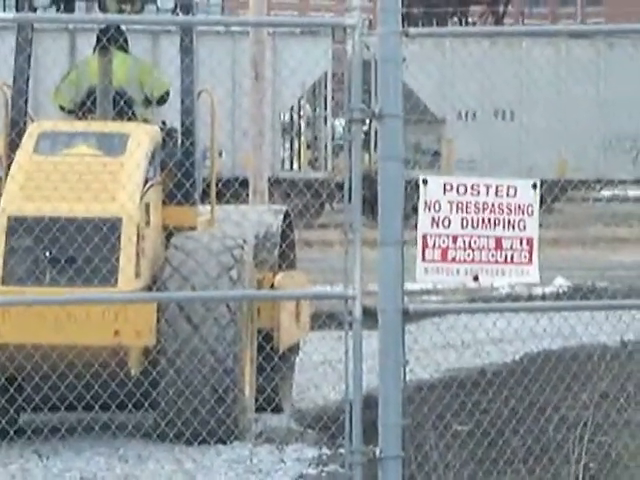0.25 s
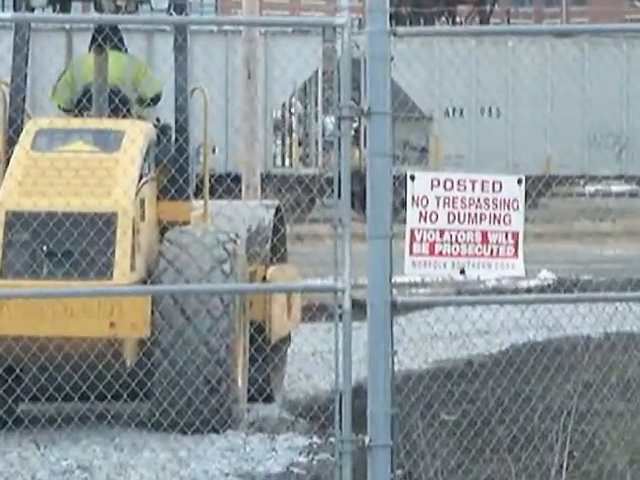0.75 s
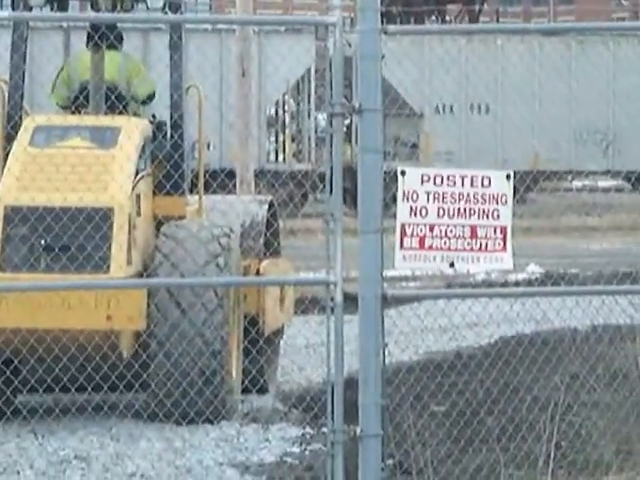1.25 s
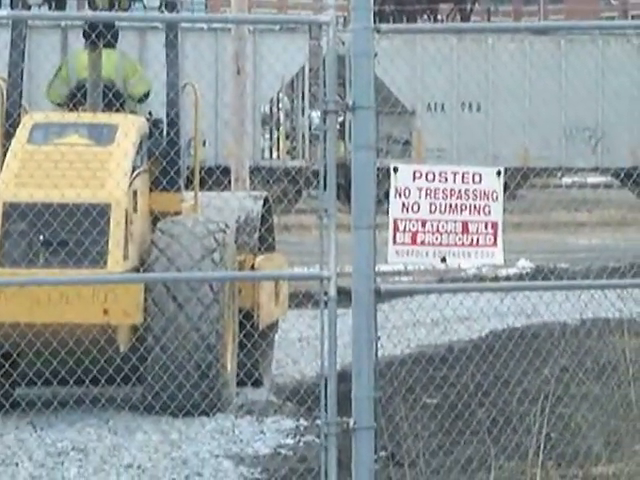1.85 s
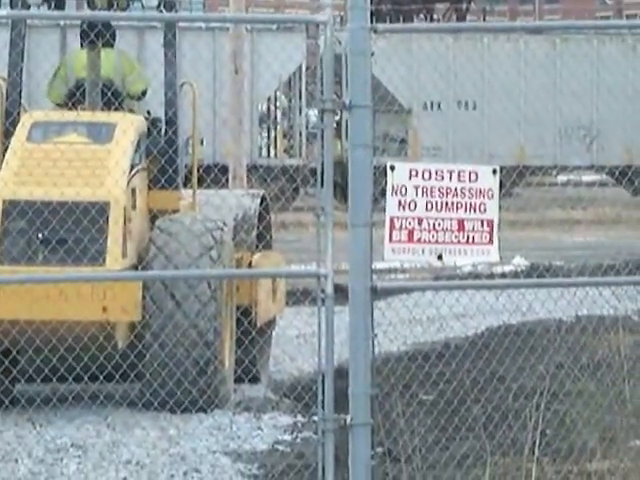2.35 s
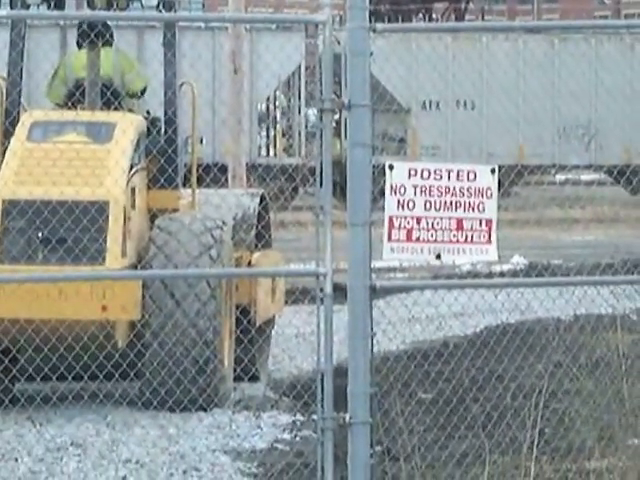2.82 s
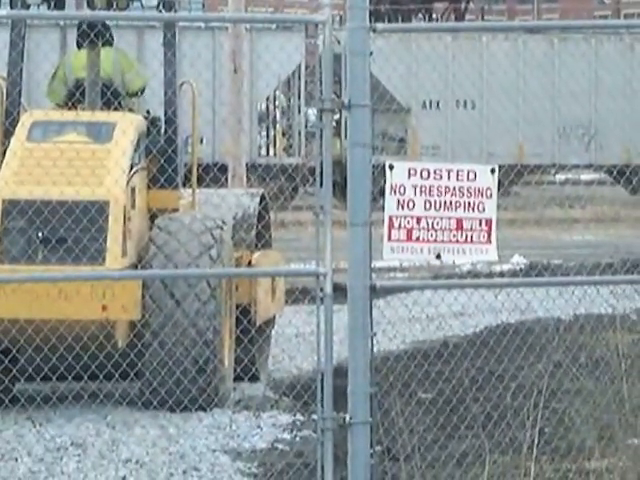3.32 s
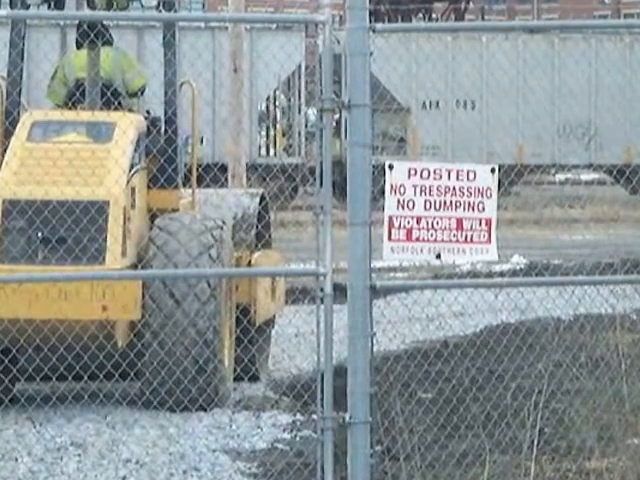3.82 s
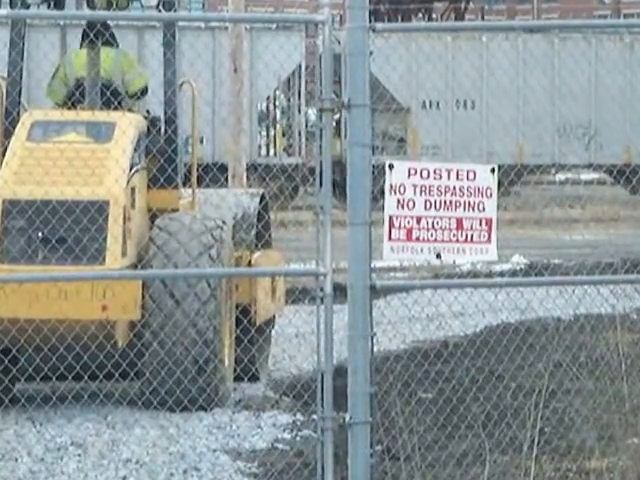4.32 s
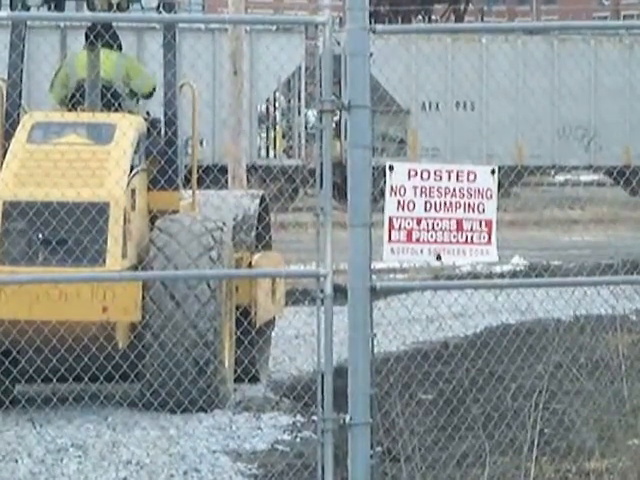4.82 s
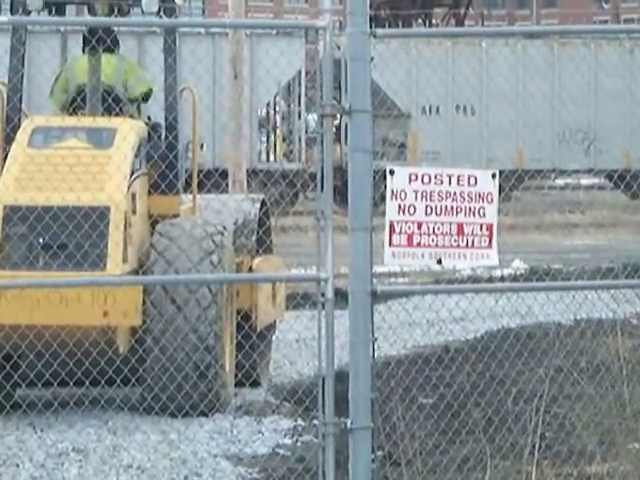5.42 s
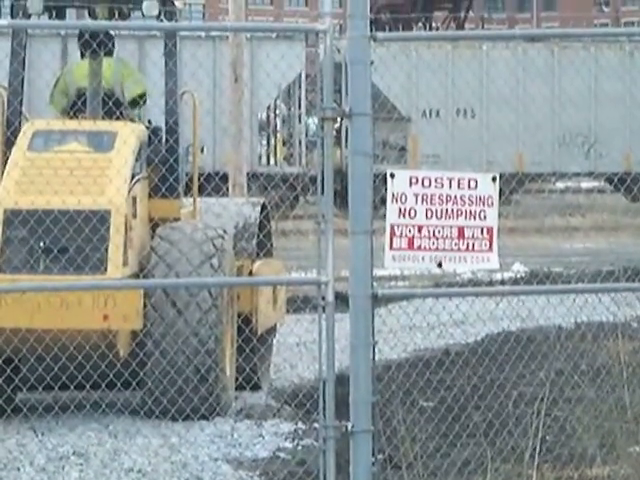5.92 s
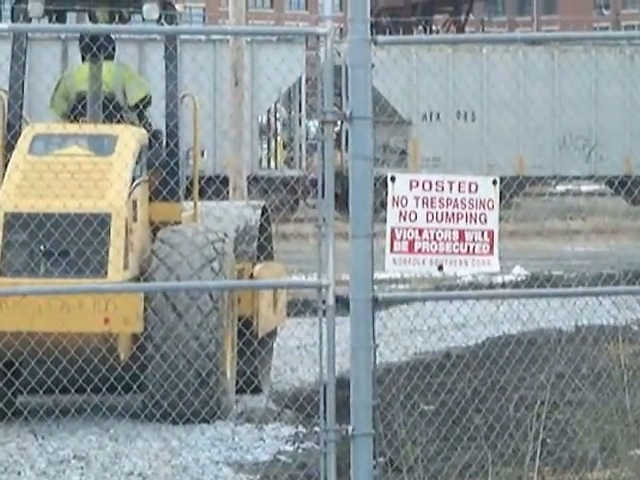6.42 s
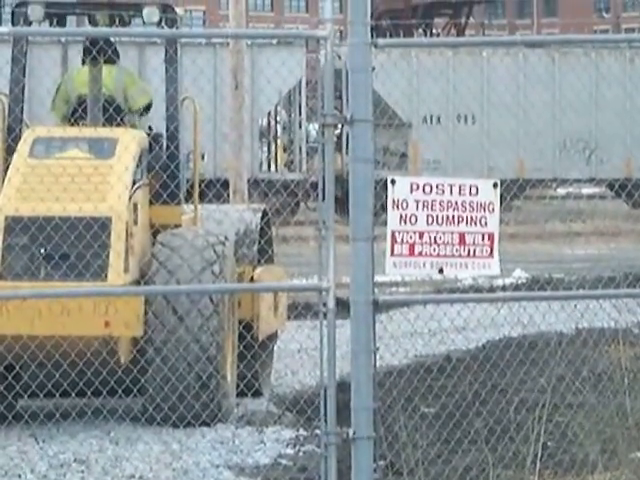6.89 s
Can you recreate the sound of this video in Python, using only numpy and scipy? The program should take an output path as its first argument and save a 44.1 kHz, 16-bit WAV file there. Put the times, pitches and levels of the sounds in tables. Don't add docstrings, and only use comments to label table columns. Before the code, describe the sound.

Outdoors at a work site, a road roller's diesel engine idles steadily from start to finish, clattering and ticking with a thin mechanical whine and airy rush. Wind dominates in the foreground, striking the microphone in irregular low thuds, rough flutter and short cracks, briefly easing between gusts. The wind overloads softly, the engine sinks beneath it, and the top end is muffled, as on a small handheld device.

```python
import sys
import numpy as np
from scipy import signal
from scipy.fft import rfft, irfft
from scipy.io import wavfile

SR = 44100
rng = np.random.default_rng(int(sys.argv[2]) if len(sys.argv) > 2 else 0)


def boost(x):
    u = np.asarray(x, float) / 20
    return 10 ** u


def int16_out(signal):
    q = np.round(np.clip(np.atleast_2d(signal).T, -1, 1) * 32767)
    wavfile.write(sys.argv[1], SR, q.astype(np.int16))


N = 315315

# t/s, level/dB
AIRFLOW = [(0.0, -21), (0.57, -17), (0.69, -33.5), (0.74, -21), (1.47, -17.5), (1.53, -32), (1.81, -17),
           (2.59, -22), (2.69, -17.5), (3.27, -18.5), (3.34, -22), (3.74, -17), (3.88, -24), (4.2, -20),
           (4.28, -21.5), (5.44, -16.5), (5.51, -19.5), (7.15, -21)]
AIRFLOW_SHARES = (0.79, 0.62, 0.76)
# start t/s, length/s, level over calm/dB
GUSTS = [(0.0, 0.054, 9.5), (0.15, 0.19, 6), (0.423, 0.13, 7), (0.734, 0.14, 19), (1.133, 0.16, 15),
         (1.274, 0.15, 21.5), (1.572, 0.04, 11), (1.829, 0.093, 13), (1.97, 0.089, 19.5), (2.226, 0.2, 10),
         (2.534, 0.16, 13), (2.72, 0.16, 17.5), (2.944, 0.21, 16.5), (3.08, 0.17, 24.5), (3.358, .2, 8),
         (3.68, 0.052, 2.5), (4.001, 0.042, 12.5), (4.106, .18, 23), (4.32, 0.074, 8.5), (4.457, .09, 15),
         (4.667, 0.3, 14), (5.068, 0.065, 21.5), (5.159, 0.27, 21), (5.482, 0.098, 11.5),
         (5.638, 0.089, 17.5), (5.87, 0.14, 16), (5.991, 0.27, 22), (6.25, 0.41, 15.5), (6.667, .2, 22),
         (6.887, .3, 21.5)]
# t/s, drop given back/dB, drop kept/dB
GAIN_DUCKS = [(-0.2, 2.5, -0.5), (0.55, 1.5, -0.5), (1.35, 3.5, -0.5), (1.8, 2, -0.5), (2.3, 0, 1.5),
              (2.95, 1, 1), (3.17, 0, 3.5), (3.26, 2.5, 1), (4.17, 2.5, -2), (4.85, 2, 0), (5.34, 3.5, 3),
              (6.35, 1.5, -0.5), (6.85, 4, -3.5)]
# f/Hz, level/dB
ENGINE_PARTS = [(770, 0), (1150, 1), (1280, 4.5), (1560, -4), (1870, -2), (2520, 0), (3330, -18),
                (4170, -11.5), (5780, -19)]
# place/cycle, lowest part/index, highest part/index, level/dB
CYCLE_STRIKES = [(.025, 0, 0, 0), (.03, 5, 5, -4), (.15, 4, 4, 0), (.15, 6, 6, -2), (.19, 0, 0, 0),
                 (.215, 2, 3, -3), (.215, 5, 8, 0), (.28, 1, 1, 0), (.28, 5, 5, 0), (.31, 3, 3, 1),
                 (.31, 0, 1, -2), (.38, 5, 6, 1), (.41, 8, 8, 0), (.445, 0, 1, 1), (.49, 6, 7, 1),
                 (.53, 5, 5, -2), (.54, 7, 7, 3), (.565, 0, 1, -1), (.56, 4, 4, 0), (.63, 5, 5, 0),
                 (.7, 2, 3, 2), (.705, 5, 8, -1), (.77, 0, 0, 0), (.78, 7, 7, -4), (.835, 4, 4, 0),
                 (.84, 1, 1, -2), (.89, 4, 5, 0), (.965, 2, 3, 2), (.98, 6, 8, 0)]
# f/Hz, rms level/dB
GEAR_TONES = [(812.9, -48), (877.5, -53), (942.1, -52), (1098, -48), (1202, -50), (1244, -50),
              (1319, -45.5), (1416, -47.5), (1534, -48), (1776, -68.5), (1857, -49.5), (2003, -48.5),
              (2186, -73.5), (2266, -62.5), (2369, -55.5), (2444, -46), (2552, -46.5), (2622, -45),
              (3074, -54.5), (4118, -58)]
# f/Hz, level per Hz/dB
RUSH_SPECTRUM = [(260, -26.5), (450, -18.5), (509, 3), (933, -4.5), (1080, -4), (1170, -9), (1420, -0.5),
                 (2210, -3), (2540, -3.5), (2800, -3.5), (4210, -12.5), (4710, -20), (6020, -21),
                 (7810, -30), (8620, -50.5), (11200, -75.5), (19000, -120)]
# middle t/s, peak level/dB, f/Hz
EDDY_ROLLS = [(0.449, -12, 108), (0.528, -13, 99), (0.579, -14, 44.4), (0.778, -14.5, 50.6),
              (1.021, -15.5, 104), (1.26, -16, 115), (1.6, -19.5, 200), (1.811, -9.5, 110),
              (1.849, -18.5, 50), (2.001, -16, 101), (2.18, -16, 108), (2.77, -18, 49.5),
              (2.882, -12.5, 120), (3.029, -9.5, 116), (3.14, -12, 85), (3.259, -16.5, 51.5),
              (2.96, -14, 191), (3.721, -11.5, 95), (4.181, -12.5, 44.4), (4.379, -20, 108),
              (4.838, -16, 46), (5.22, -13.5, 200), (5.31, -12.5, 111), (5.429, -16, 50), (5.7, -19, 50.5),
              (6.118, -12, 100), (6.35, -18, 49.7), (6.73, -13.5, 117), (7.039, -15.5, 50),
              (7.109, -12, 113)]
# t/s, peak level/dB, centre f/Hz
AIR_SLAPS = [(0.738, -2.5, 180), (1.021, -5.5, 174), (1.371, 0.5, 200), (1.407, -13, 276), (1.897, 0, 218),
             (2.186, 2, 176), (2.939, -9, 186), (3.145, -4, 240), (3.168, -0.5, 191), (3.196, -12, 383),
             (3.228, -4.5, 199), (3.525, -4.5, 182), (3.999, -5, 195), (4.096, -9, 218), (4.188, -1, 219),
             (4.233, -17, 171), (4.362, -0.5, 176), (4.473, -29, 183), (4.5, -4, 294), (4.532, -12, 325),
             (4.957, -4, 197), (5.049, -4, 235), (5.181, -1, 226), (5.384, -9, 242), (5.624, -11, 230),
             (5.901, -3, 265), (6.116, -8, 276), (6.195, -8, 310), (7.098, -0.5, 253)]
# t/s, peak level/dB, centre f/Hz
AIR_CRACKS = [(0.738, -19, 540), (1.36, -10.5, 534), (1.407, -19.5, 584), (3.196, -18.5, 544),
              (3.268, -9.5, 380), (4.165, -11.5, 480), (4.189, -17, 536), (4.235, -17, 546),
              (4.475, -14.5, 501), (4.534, -13, 517), (5.108, -11.5, 620), (5.184, -19, 552),
              (5.386, -21, 616), (5.623, -22, 595), (6.115, -14, 595), (6.196, -20, 536),
              (7.099, -18.5, 651)]
# f/Hz, rms level/dB
CONVERTER_TONES = [(7986, -83), (8014, -83)]

CALM_RASP_DB, CALM_FLUTTER_DB, CALM_THUD_DB, CALM_BUFFET_DB = -46.5, -31.5, -22, -24.5
MEAN_FLOW_DB = -19
GUST_RISE_S, GUST_FALL_S = 0.03, 0.045
GUST_SHARE, FLUTTER_FULL_DB = 0.65, 14
CALM_FOLLOWS = 0.27
ENGINE_DB, DUCK_S, RECOVER_S = -36.5, 0.031, 0.44
CYCLE_HZ = 9.147
PART_SPREAD_CYCLES = 0.015
ROLL_CYCLES = 1.67


def rms_one(x):
    return x / np.sqrt(np.mean(x ** 2) + 1e-20)


def drift(rate_hz):
    pole = np.exp(-20 * np.pi * rate_hz / SR)
    noise = rng.standard_normal(N // 10 + 8002)
    slow = signal.lfilter([1], [1, -2 * pole, pole * pole], noise)[8000:]
    return np.interp(np.arange(N) / 10, np.arange(len(slow)), rms_one(slow))


def low_pass(x, hz, order=2):
    return signal.sosfilt(signal.butter(order, hz, fs=SR, output="sos"), x)


def band(x, low_hz, high_hz, order=2):
    return signal.sosfilt(signal.butter(order, [low_hz, high_hz], "band", fs=SR, output="sos"), x)


def noise_band(low_hz, high_hz, order=2):
    return rms_one(band(rng.standard_normal(N + SR // 2), low_hz, high_hz, order=order)[-N:])


def gain_control():
    t = np.arange(N) / SR
    level_db = np.full(N, ENGINE_DB)
    for s, back_db, kept_db in GAIN_DUCKS:
        since_s = np.maximum(t - s, 0)
        onset = 1 - np.exp(-since_s / DUCK_S)
        level_db = level_db - onset * (kept_db + 1.49 * back_db * np.exp(-since_s / RECOVER_S))
    return level_db


def gusts():
    t = np.arange(N) / SR
    calm_db = CALM_FOLLOWS * (gain_control() - ENGINE_DB)
    gust_db = calm_db
    for s, length_s, peak_db in GUSTS:
        rise = (t - s) / GUST_RISE_S + 1
        fall = (s + length_s - t) / GUST_FALL_S + 1
        shape = np.clip(np.minimum(rise, fall), 0, 1)
        gust_db = np.maximum(gust_db, calm_db + (peak_db - calm_db) * shape)
    return gust_db


def airflow():
    flow_s, level_db = np.transpose(AIRFLOW)
    flow_db = np.interp(np.arange(N) / SR, flow_s, level_db) - MEAN_FLOW_DB
    gust_db = gusts()
    buffet_db, thud_db, flutter_db = (share * flow_db for share in AIRFLOW_SHARES)
    stirred_db = GUST_SHARE * np.minimum(gust_db, FLUTTER_FULL_DB)
    return (CALM_BUFFET_DB + buffet_db, CALM_THUD_DB + thud_db,
            CALM_FLUTTER_DB + flutter_db + stirred_db, CALM_RASP_DB + gust_db)


def wind(buffet_db, thud_db, flutter_db, rasp_db):
    lumps = drift(29)
    buffet = noise_band(16, 70)
    thud = rms_one(noise_band(67.8, 149.8, order=3) * boost(lumps + drift(33)))
    flutter = low_pass(noise_band(145, 330, order=4), 200)
    flutter = rms_one(flutter * boost(2.4 * lumps + 0.99 * drift(42)))
    burst_db = 1.4 * lumps + 2.0 * drift(60) + 4.43 * drift(350)
    bursts = band(rng.standard_normal(N) * boost(burst_db), 293, 1500, order=3)
    dull = rms_one(low_pass(bursts, 441, order=4))
    bright = rms_one(band(low_pass(bursts, 500, order=3), 439, 2500))
    rasp = dull + boost(-12.0 + 0.5 * (rasp_db + 20.5)) * bright
    large = boost(buffet_db + 0.3) * buffet + boost(thud_db - 2.5) * thud
    small = boost(flutter_db - 0.54) * flutter + boost(rasp_db - 0.5) * rasp
    return large + small


def contacts():
    struck = []
    for place, low, high, strike_db in CYCLE_STRIKES:
        for k, (hz, part_db) in enumerate(ENGINE_PARTS[low:high + 1]):
            delay = PART_SPREAD_CYCLES * (k - (high - low) / 2)
            struck.append((place + delay, hz, part_db + strike_db))
    return struck


def knocks(ring_s, fresh, wander_s, jitter_s, spread_db):
    cycles = np.arange(-1, N / SR * CYCLE_HZ)
    t = np.arange(SR // 40) / SR
    envelope = t / ring_s * np.exp(-t / ring_s)
    wander = wander_s * drift(1.6)
    out = np.zeros(N + 2 * SR)
    for place, hz, level_db in contacts():
        same = rng.standard_normal(len(t))
        changed = fresh * (hz / 1500) ** 1.5 * rng.standard_normal((len(cycles), len(t)))
        rings = rms_one(band((same + changed) * envelope, hz - 220, hz + 220))
        start_s = (cycles + place) / CYCLE_HZ - 1.5 * ring_s
        late_s = wander[np.clip(start_s * SR, 0, N - 1).astype(int)]
        late_s = late_s + jitter_s * rng.standard_normal(len(cycles))
        gains = boost(level_db + spread_db * rng.standard_normal(len(cycles)))
        starts = ((start_s + late_s + 1) * SR).astype(int)
        for i, gain, ring in zip(starts, gains, rings):
            out[i:i + len(t)] += gain * ring
    return rms_one(out[SR:SR + N])


def whine(wobble_rad, flicker_db):
    t, out = np.arange(N) / SR, 0
    for hz, level_db in GEAR_TONES:
        twist = wobble_rad * np.sqrt(hz / 2000) * drift(2.77)
        phase = 2 * np.pi * (hz * t + rng.random()) + twist
        out = out + boost(level_db + flicker_db * drift(1.8)) * np.sin(phase)
    return out


def rush(throb_db):
    hz = np.arange(N // 2 + 1) * SR / N + 1
    point_hz, point_db = np.transpose(RUSH_SPECTRUM)
    shape = boost(np.interp(np.log(hz), np.log(point_hz), point_db))
    firing = np.cos(2 * np.pi * (4 * CYCLE_HZ * np.arange(N) / SR + 0.2))
    throbbing = rng.standard_normal(N) * boost(throb_db * firing)
    return rms_one(irfft(rfft(throbbing) * shape, N))


def engine(level_db):
    clatter = knocks(ring_s=0.003, fresh=0.3, wander_s=0.0002, jitter_s=0.00002, spread_db=0.8)
    steady = boost(37.0) * whine(wobble_rad=1.75, flicker_db=0.54) + boost(-0.5) * rush(throb_db=1.0)
    return boost(level_db) * (boost(-1.5) * clatter + steady)


def rolls():
    out, t = np.zeros(N + SR), np.arange(-SR // 5, SR // 5) / SR
    for (s, peak_db, hz), turn in zip(EDDY_ROLLS, rng.random(len(EDDY_ROLLS))):
        swell = np.exp(-(t * hz / ROLL_CYCLES) ** 2)
        roll = swell * np.sin(2 * np.pi * (hz * t + turn))
        out[round(s * SR):][:len(t)] += boost(peak_db) * roll
    return out[SR // 5:][:N]


def swings(events, gain_db):
    out, t = np.zeros(N + SR), np.arange(SR // 40) / SR
    signs = rng.choice([-1, 1], len(events))
    for (s, peak_db, hz), sign in zip(events, signs):
        middle = t - 0.9 / hz
        swing = np.cos(2 * np.pi * hz * middle) * np.exp(-(middle * hz / 0.45) ** 2)
        out[round(s * SR):][:len(t)] += sign * boost(peak_db + gain_db) * swing
    return out[:N]


def slaps():
    return swings(AIR_SLAPS, gain_db=-6.5) + swings(AIR_CRACKS, gain_db=0.5)


def scene():
    return (wind(*airflow()) + engine(gain_control()) + rolls() + slaps())[None]


def top_cut(x):
    return signal.sosfilt(signal.butter(12, 15700, fs=SR, output="sos"), x)


def record(dry):
    t = np.arange(N) / SR
    tones = sum(boost(level_db + 3) * np.sin(2 * np.pi * hz * t) for hz, level_db in CONVERTER_TONES)
    rounded = 1.151 * np.tanh(dry)
    step = np.abs(rounded) + 0.043
    grit = boost(-36.0) * band(step * rng.standard_normal(N), 4500, 8340)
    cut = signal.sosfiltfilt(signal.butter(6, 7700, fs=SR, output="sos"), rounded + grit)
    cut = low_pass(cut[:, ::-1], 8950, order=12)[:, ::-1]
    image = boost(-78.0) * rounded * np.cos(2 * np.pi * 11735 * t)
    haze = boost(-97.5) * noise_band(10800, 15500)
    return top_cut(cut + tones + image + haze)


dry = scene()
out = record(dry)
int16_out(out)
```